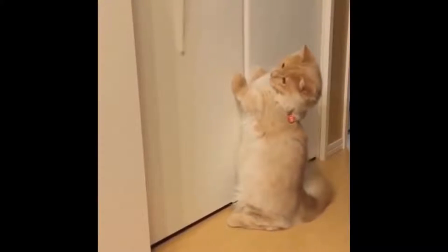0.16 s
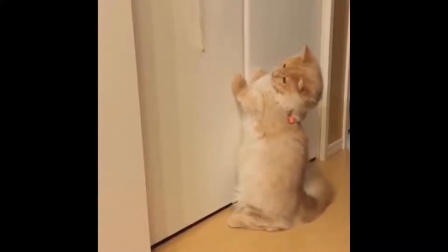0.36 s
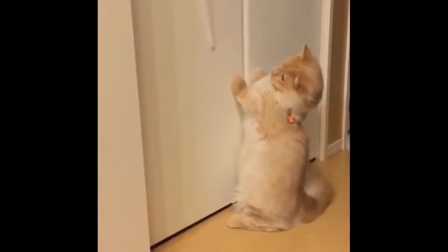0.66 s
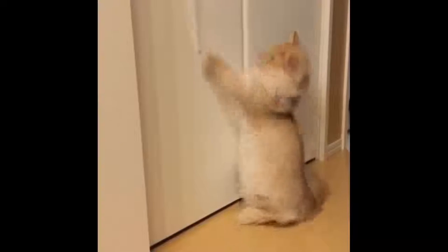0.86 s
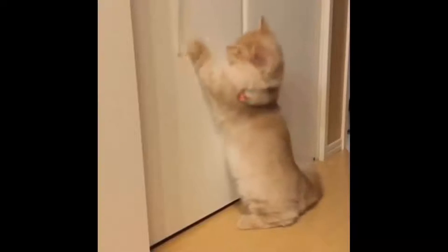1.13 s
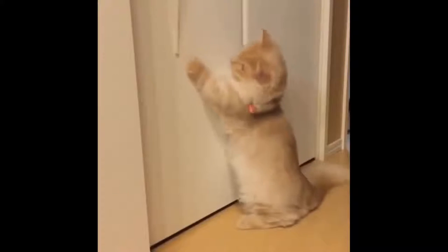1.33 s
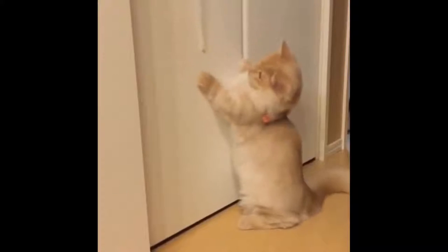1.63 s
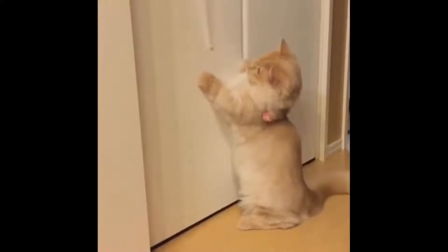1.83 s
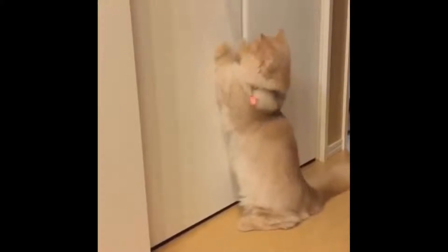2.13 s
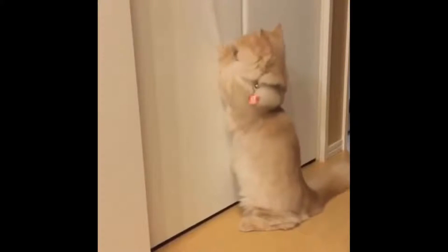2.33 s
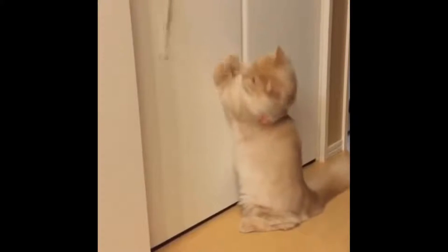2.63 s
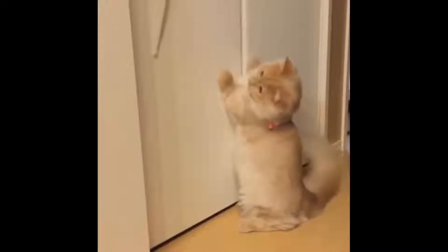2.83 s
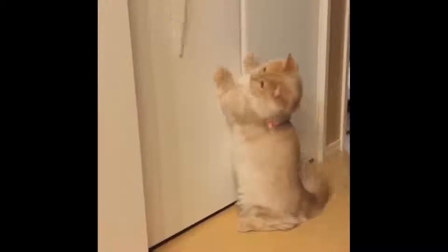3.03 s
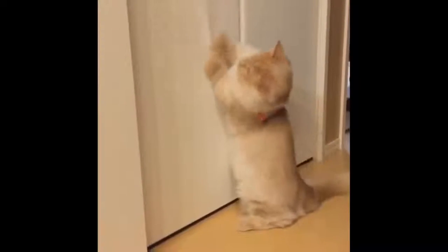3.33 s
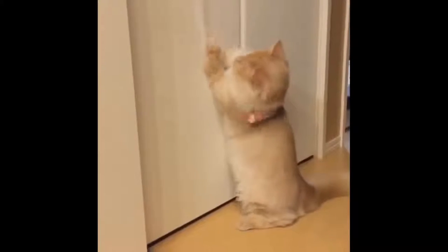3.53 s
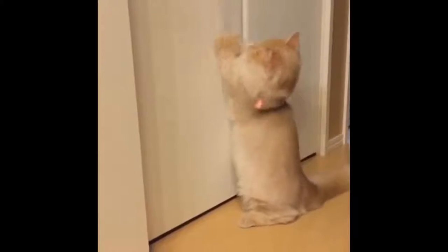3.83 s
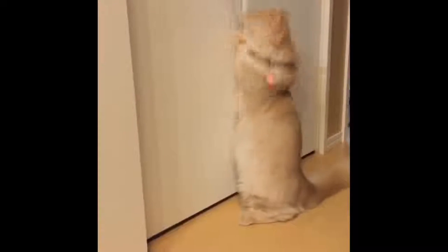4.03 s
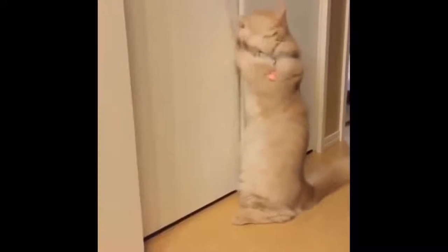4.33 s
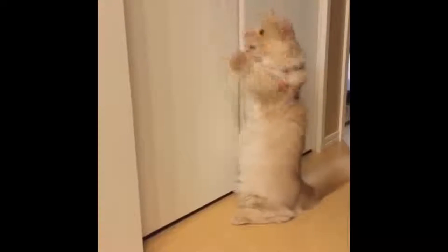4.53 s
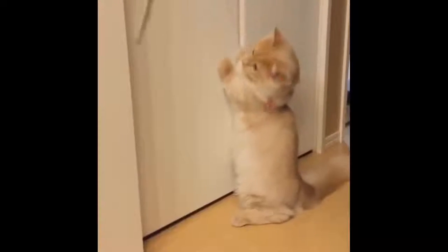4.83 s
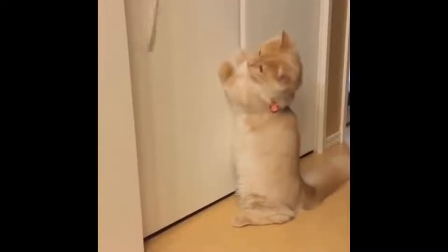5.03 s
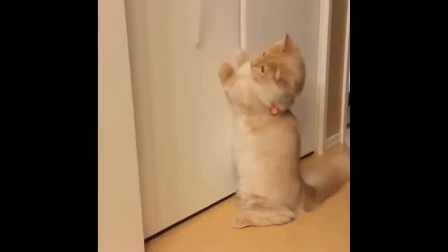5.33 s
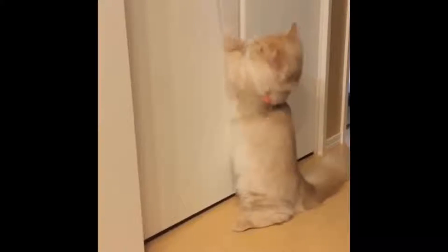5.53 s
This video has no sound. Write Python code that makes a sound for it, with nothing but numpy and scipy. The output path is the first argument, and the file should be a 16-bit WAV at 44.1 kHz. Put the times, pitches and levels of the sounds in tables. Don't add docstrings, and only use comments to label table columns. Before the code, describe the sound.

In a small quiet room with a low motor hum and faint hiss, a cat paws at a hollow door. Soft knocks, squeaky pad slips and muffled bell ticks come first; then hard slaps set off fast, bright jingling around two seconds. After a lull, a longer flurry of scratching, slapping and jingling follows, ending with two sparser taps. A small camera microphone picks it up fairly close, with a short room echo.

```python
import sys
import numpy as np
from scipy import signal
from scipy.fft import rfft, irfft
from scipy.io import wavfile
from scipy.ndimage import uniform_filter1d

SR = 44100
rng = np.random.default_rng(int(sys.argv[2]) if len(sys.argv) > 2 else 0)


def nominal_scale(level):
    x = np.asarray(level, float) / 20
    return 10 ** x


def unload_wav(signal):
    wavfile.write(
        sys.argv[1],
        SR,
        np.round(np.clip(np.atleast_2d(signal).T, -1, 1) * 32767).astype(np.int16),
    )


N = 250488

# pitch_hz, level_db
HUM = [(59.6, -57.5), (118.4, -52), (180, -67.5), (296.1, -79.5)]
# time_s, level_db
HUM_SAG = [(0, -3), (1.5, -1.5), (3, -3), (4.5, -2.5), (5.68, -3.5)]
# pitch_hz, level_db (per Hz)
AIR = [(15, -32), (35, -13), (60, -4.5), (85, -8), (118, -5), (150, -13), (185, -16), (240, -24),
       (590, -28), (1100, -36.5), (2400, -36.5), (9500, -43), (10500, -44.5), (14000, -43)]
AIR_DB, TOP_HZ = -60.5, 14000

# pitch_hz, width_hz, level_db
PANEL_LOW = [(1460, 150, -3), (1864, 50, -1), (2180, 43, -6.5), (2443, 170, -17), (1270, 520, -41)]
PANEL_HIGH = [(2540, 1160, 9), (3140, 1100, 6), (3900, 1700, 2.5)]
# pitch_hz, width_hz
FUR = (6960, 3800)
# firmest_s, pressure_db, press_s, release_s, squeak_hz
PADS = [(.4, -70, 0.12, .1, 2000), (.508, -61, 0.15, 0.017, 1460), (.56, -62.5, 0.039, 0.1, 1450),
        (1.026, -64.5, 0.12, 0.027, 1460), (1.138, -44, 0.041, 0.039, 1470),
        (1.13, -52, 0.029, 0.075, 2216), (1.224, -46.5, 0.029, 0.012, 1540),
        (1.31, -55, 0.014, 0.081, 1396), (1.42, -74, .1, 0.033, 1670), (1.26, -56.5, .03, 0.06, 1940),
        (1.722, -65, 0.11, 0.11, 1460), (1.78, -55, 0.03, 0.017, 1470), (3.264, -81, 0.085, .04, 2020),
        (3.45, -60, 0.097, 0.065, 1940), (4.39, -53, 0.021, 0.067, 1770),
        (4.442, -62.5, 0.053, 0.032, 1600)]
# firmest_s, pressure_db, press_s, release_s, squeak_hz
SCRATCHES = [(2.125, -49.5, 0.036, 0.05, 2950), (2.155, -49, 0.053, 0.058, 1760),
             (3.395, -49.5, 0.0083, 0.066, 2100), (5.315, -64, 0.023, 0.037, 2870),
             (5.015, -72, 0.015, 0.037, 2200), (2.215, -43, 0.031, 0.047, 2190),
             (2.341, -48, 0.046, 0.1, 2010), (2.603, -62.5, 0.096, 0.038, 2600),
             (3.366, -39, 0.022, 0.018, 1690), (3.525, -36, 0.028, 0.038, 1750),
             (3.692, -50, 0.022, 0.023, 1550), (3.6, -51, 0.014, 0.057, 1710),
             (4.024, -54, 0.023, 0.019, 1840)]
# firmest_s, pressure_db, press_s, release_s, centre_hz
DRAGS = [
    (3.14, -71, 0.049, .06, 2410),
    (3.215, -63.5, .08, 0.093, 2400),
    (3.265, -74, 0.034, 0.015, 2110),
    (3.835, -57, .015, 0.11, 1860),
    (3.884, -54.5, .06, 0.064, 2030),
    (3.95, -71, 0.069, .08, 1780),
    (4.0, -63, .1, .035, 1760),
]
# loudest_s, level_db, swell_s, fade_s
RUSTLES = [(1.026, -73.5, 0.079, 0.063), (1.3, -71, 0.04, 0.05), (2.13, -61.5, 0.05, 0.098),
           (2.217, -66, 0.06, 0.062), (2.398, -64.5, 0.19, 0.057), (3.366, -59.5, 0.067, 0.062),
           (3.54, -59, 0.088, 0.084), (3.69, -67, 0.047, 0.19), (4.024, -66, 0.016, 0.026),
           (4.435, -68, 0.083, 0.12), (4.504, -69, 0.022, 0.059), (4.76, -76, 0.35, 0.28)]
SLIPS_PER_S, SLIP_SPREAD_DB, CLUMP_DB = 2800, 2, 2.8

# start_s, level_db, pitch_hz, fall_60db_s
CATCHES = [(.501, -51, 1460, 0.075), (1.094, -48, 1460, 0.049), (1.122, -47, 2160, .06),
           (1.137, -43, 2155, 0.062), (1.138, -42.5, 1425, 0.056), (1.216, -49, 2240, .05),
           (1.222, -49, 1572, 0.044), (1.244, -54, 1500, .05), (1.773, -51.5, 1410, 0.056),
           (2.1, -45, 1390, 0.053), (2.106, -44, 2270, .04), (2.107, -48, 3160, .04),
           (2.109, -56, 1380, 0.072), (2.11, -43, 4160, 0.055), (2.116, -40.5, 2180, 0.068),
           (2.116, -43, 3300, .04), (2.119, -52, 2760, .04), (2.12, -52, 1410, .07),
           (2.172, -50, 1460, 0.06), (2.127, -42, 2734, 0.057), (2.127, -43, 4440, 0.036),
           (2.128, -45, 2350, 0.052), (2.132, -46.5, 1354, 0.12), (2.146, -40.5, 2000, .06),
           (2.153, -47, 1590, 0.065), (2.161, -48, 1985, 0.069), (2.202, -43, 2200, 0.073),
           (2.212, -43, 2930, .05), (2.218, -40, 2210, 0.041), (3.328, -54.5, 1460, 0.087),
           (3.344, -53, 1390, .05), (3.357, -39.5, 1410, 0.06), (3.365, -36.5, 2236, 0.039),
           (3.365, -36, 1490, 0.061), (3.391, -48, 1460, 0.07), (3.398, -43, 2350, .05),
           (3.398, -43, 3900, 0.045), (3.402, -46, 1960, 0.043), (3.576, -45, 1545, .09),
           (3.681, -52, 1534, .05), (3.692, -45, 1518, 0.066), (3.697, -49.5, 2370, 0.07),
           (3.858, -54, 2160, .06), (3.876, -57, 1800, .05), (3.886, -54, 3230, 0.067),
           (3.892, -64, 2000, 0.066), (4.026, -44.5, 1803, 0.038), (4.024, -46, 3230, 0.033),
           (4.379, -39, 1560, 0.038), (4.397, -60, 1630, 0.069), (4.404, -57, 1716, 0.063),
           (3.823, -61, 1415, 0.19), (4.009, -56, 874, 0.088)]
# start_s,
# level_db, pitch_hz, fall_60db_s
CHATTER = [(2.3125, -36, 7700, .012), (2.3125, -36, 10400, 0.011), (2.317, -37, 8600, .012),
           (3.5, -37, 8200, .012), (2.311, -37, 2000, 0.052), (2.311, -43, 2900, 0.023),
           (2.314, -23.5, 1530, 0.031), (2.315, -36, 2500, 0.036), (2.319, -43, 3050, 0.039),
           (2.334, -37, 1940, 0.052), (2.335, -41, 2600, .04), (2.349, -40, 1840, 0.043),
           (2.368, -40, 1460, 0.036), (2.5915, -38.5, 2350, 0.012), (2.5915, -50, 1150, 0.01),
           (2.598, -60, 2740, 0.069), (2.75, -54, 2020, .05), (2.752, -58, 2662, 0.079),
           (3.4995, -30.5, 3160, 0.024), (3.4995, -36, 4040, .03), (3.5, -30, 2260, 0.015),
           (3.504, -43, 2320, .03), (3.508, -30.5, 1767, 0.042), (3.518, -37, 1420, 0.055),
           (3.521, -36, 2174, 0.088), (3.521, -43, 3980, 0.087), (3.53, -49, 3190, 0.061),
           (3.537, -38, 1460, .05), (3.551, -44, 1460, 0.041), (3.556, -44, 2070, 0.056),
           (4.319, -40.5, 3180, 0.037), (4.319, -39, 960, 0.025), (4.319, -27.5, 2080, 0.023),
           (4.321, -44, 4220, 0.027), (4.327, -40, 2080, .04), (4.329, -50, 1270, 0.06),
           (4.342, -43, 1940, 0.066), (4.336, -51.5, 299, .12), (4.43, -54, 300, .1),
           (4.9925, -49, 1890, 0.027), (4.9925, -35.5, 2160, 0.022), (4.9925, -54, 720, 0.088),
           (5.001, -40, 2040, 0.041), (5.004, -49, 1330, 0.046), (5.009, -51, 1840, .04),
           (5.014, -41, 2050, 0.056), (5.306, -50, 1890, .04), (5.307, -52.5, 2730, .05),
           (5.319, -64, 2800, 0.045), (5.324, -60, 2300, .06)]
CATCH_RISE_S, CHATTER_RISE_S = 0.0013, 0.00075

# start_s, level_db, pitch_hz, second_pitch_hz, crack_db (against the blow)
KNOCKS = [(0.5019, -82, 1450, 1980, -24), (1.0191, -66.5, 1500, 2060, -13),
          (1.0943, -54.5, 1590, 2130, -15), (1.113, -51.5, 2720, 2220, -7.5),
          (1.1355, -50, 2180, 1530, -12), (1.2223, -42.5, 1600, 2240, -21), (1.776, -69, 1440, 1920, -23),
          (2.1073, -43, 1490, 2180, -12), (2.204, -41.5, 2270, 1370, -5.5), (3.253, -57, 1780, 2180, -13),
          (3.359, -47, 1520, 2370, -18), (3.3909, -42.5, 1960, 2600, -4.5),
          (3.678, -48.5, 1580, 2290, -2.5), (3.8646, -58, 2130, 2210, -7.5),
          (4.379, -42.5, 1650, 1470, -10)]
# start_s, level_db, pitch_hz, second_pitch_hz, crack_db (against the blow)
TIPS = [
    (2.5917, -48.5, 2600, 1080, -15),
    (2.7508, -46, 2070, 2690, -12),
    (5.3053, -44, 1940, 2720, -12.5),
]
# start_s, level_db, pitch_hz, second_pitch_hz, crack_db (against the blow)
SLAPS = [
    (1.214, -42, 1600, 1010, -14),
    (1.3066, -46, 1150, 680, -18),
    (2.311, -27, 1620, 1180, -5),
    (3.5, -28, 2020, 1520, 1),
    (4.0247, -50.5, 1840, 2480, 5),
    (4.319, -33.5, 2120, 1310, -10.5),
    (4.9922, -34.5, 1850, 1480, -13),
]
KNOCK_T60, TIP_T60, SLAP_T60 = 0.24, 0.16, 0.27
THIN_HZ = 1150

# pitch_hz, level_db, fall_60db_s
SHELL_LOW = [(5598, 0, 0.115), (5572, -9.5, 0.22)]
SHELL_HIGH = [(13855, 0, .14), (13812, -5, .12), (13456, -21, .12)]
# pitch_hz, width_hz, level_db
TICK = [(6350, 400, 2.5), (6800, 7000, 4.5), (7470, 1600, -1), (8280, 770, 3.5), (9030, 590, -6.5),
        (11600, 2700, -7)]
# start_s, ring_db, pitch_hz, tick_db (against the ring)
MUFFLED = [(1.0216, -58, 6360, -11), (1.2978, -50, 6280, -18), (1.3274, -56.5, 6330, -1),
           (2.715, -84.5, 6300, 33), (3.289, -59.5, 6350, -2), (3.346, -40, 6270, -19),
           (3.412, -42.5, 6320, 0), (3.6178, -43, 6000, -5), (3.695, -51, 6160, -15),
           (3.864, -56, 6330, -14), (3.952, -61, 6170, 4), (4.305, -49, 6300, 5), (4.8938, -55, 6520, 7.5),
           (4.948, -67, 6260, 16.5), (5.0325, -64, 6340, 3), (5.165, -56, 6200, 1), (5.174, -55, 6460, 1),
           (5.598, -57.5, 6300, 4), (5.619, -65.5, 6240, 14), (5.643, -56, 6440, 5.5)]
# start_s, low_ring_db, high_ring_db, tick_db (last two against low)
FREE_STRIKES = [(2.108, -51, -24, -15), (2.1263, -37, -28, -11), (2.14, -39.5, -4, -28), (2.161, -47.5, -12, 2),
                (2.187, -42, -20, -8), (2.195, -38.5, -12, -17), (2.212, -44, -19, -32),
                (2.2525, -56, -14, -18), (2.344, -46, -9, -4), (2.369, -37, -22, -19), (2.387, -44.5, -1, -1),
                (2.396, -44, -4, -12), (2.428, -48, -9, -20), (2.503, -54, -45, -12), (2.5177, -43.5, -18, -11),
                (2.528, -41.5, -22, -18), (2.563, -56, -32, -25), (3.563, -45, -7, -25), (3.737, -48.5, 2, -25),
                (3.813, -54, -17, -25), (3.94, -61, -22, -20), (3.5512, -40, -9, -21), (3.574, -44, -3, -22),
                (3.59, -36.5, -10, -11), (3.606, -32, -8, -12), (3.637, -40, -3, -9), (3.659, -43.5, 4, -9),
                (3.669, -42, 2, -20), (3.693, -50.5, 5, -14), (3.718, -38.5, -9, -21), (3.751, -50.5, -2, -18),
                (3.789, -46, -3.5, -29), (3.9062, -42.5, -13, -8),
                (4.043, -40, -5, -15), (4.0664, -42.5, -8, -28), (4.089, -38, -1, -12),
              (4.144, -38, -9.5, -14), (4.104, -47, -1, -27), (4.193, -52.5, 0, -25),
              (4.525, -42.5, -1, -28), (4.642, -70, -22, -20), (4.242, -52, -12, -18), (4.297, -45, -6, -6),
              (4.3197, -38.5, -23, -5), (4.335, -38, -19, -16), (4.346, -35.5, -15, -13),
              (4.37, -55, 7, -7), (4.3882, -48, 0, -9), (4.4135, -35, -27, -9), (4.423, -36, -13, -11),
              (4.4413, -36, -8, -11), (4.454, -44.5, 4, -24), (4.471, -46, -6, -16),
              (4.4829, -38, -11, -16), (4.505, -29.5, -18, -15), (4.569, -42, -9, -18),
              (4.679, -71, -16, -9), (4.695, -42.5, -16, -7), (5.0502, -41.5, -20, -3),
              (5.0977, -44.5, -37, -8), (5.1935, -43.5, -10, -11), (5.246, -61, -26, -14)]
RESTS_S = [2.153, 2.178, 2.29, 2.4793, 2.541, 3.651, 3.677, 3.706, 3.73, 3.808, 3.922, 4.082, 4.1, 4.262,
           4.31, 4.357, 4.458, 4.476, 4.618, 5.086, 5.1497, 5.203]
MUFFLED_T60, RING_RISE_S = 0.055, 0.0028
SHELL_WANDER = .0016
STEP_SLIP = 1.0
ROLL_DB = 2.3

# start_s, level_db, pitch_hz, fall_60db_s, upper_db (against the thud)
THUDS = [(1.236, -43.5, 276, 0.09, -10.5), (1.228, -41.5, 180, 0.085, -23), (1.257, -38.5, 133, 0.14, -29),
         (1.307, -37, 262, 0.13, -12), (1.343, -45, 280, 0.09, -10), (1.389, -51, 272, 0.076, -14),
         (1.44, -53, 330, .08, -20), (4.14, -58, 320, .1, -20), (3.37, -55, 240, .1, -15),
         (2.2, -52, 260, .1, -15), (1.435, -41, 130, 0.088, -36), (2.099, -30.5, 238.5, 0.078, -11.5),
         (2.138, -45, 348, 0.069, -7), (2.303, -31.5, 285.7, 0.091, -15), (2.339, -46, 364, 0.093, 4),
         (3.497, -34.5, 231.6, 0.11, -4), (3.538, -41.5, 356, 0.056, -9), (4.319, -32.5, 249, 0.067, -14.5),
         (2.75, -53.5, 925, 0.073, -28), (4.825, -47, 180, 0.12, -17)]
# start_s, level_db
BUMPS = [
    (1.3167, -35),
    (1.3655, -40),
    (2.331, -49),
    (3.52, -43),
    (4.352, -44),
]
BUMP_HZ, BUMP_T60 = 61.5, .36

# pitch_hz, fall_60db_s
ROOM = [(200, 0.38), (1500, 0.13), (5000, 0.17), (13000, 0.15)]
ROOM_DB = -2.5
CATCH_ROOM, THUD_ROOM, BELL_ROOM = 0.3, .4, .35


def evened(x):
    return x / np.sqrt(np.mean(x ** 2) + 1e-20)


def wander(n, span):
    return evened(uniform_filter1d(rng.standard_normal(n), span))


def read(points, hz):
    f, value = np.transpose(points)
    return np.interp(np.log(hz + 1), np.log(f + 1), value)


def add(mix, s, sound):
    part = mix[round(s * SR):][:len(sound)]
    part += sound[:len(part)]


def rise(t, rise_s):
    return 1 - np.exp(-t / rise_s)


def fall(t, t60):
    return nominal_scale(-60 * t / t60)


def ring(modes, t, detune=1, phase=0):
    x = np.zeros(len(t))
    for hz, db, t60 in modes:
        x += nominal_scale(db - 60 * t / t60) * np.sin(2 * np.pi * hz * detune * t + phase)
    return x / abs(x).max()


def resonate(x, hz, width):
    turn = np.exp(2j * np.pi * np.cumsum(hz * np.ones(len(x))) / SR)
    r = np.exp(-np.pi * width / SR)
    smooth = signal.lfilter([(1 - r) ** 2], [1, -2 * r, r * r], x / turn)
    return 2 * (turn * smooth).real


def thin(x):
    return signal.sosfilt(signal.butter(4, THIN_HZ, "high", fs=SR, output="sos"), x)


def hum():
    t, out = np.arange(N) / SR, np.zeros(N)
    sag = np.interp(t, *np.transpose(HUM_SAG))
    for hz, db in HUM:
        level = nominal_scale(db + sag + 0.81 * wander(N, 6000))
        out += np.sqrt(2) * level * np.sin(2 * np.pi * hz * t)
    return out


def air():
    hz = np.fft.rfftfreq(N, 1 / SR)
    spectrum = rfft(rng.standard_normal(N)) * nominal_scale(read(AIR, hz)) * (hz < TOP_HZ)
    return nominal_scale(AIR_DB) * evened(irfft(spectrum, N))


def swell(s, db, rise_s, fall_s):
    at = np.arange(max(round((s - 2 * rise_s) * SR), 0), round((s + 2 * fall_s) * SR))
    late = at / SR - s
    return at, nominal_scale(db - 20 * np.maximum(-late / rise_s, late / fall_s))


def slipping():
    happens = rng.random(N) < SLIPS_PER_S / SR
    size = nominal_scale(SLIP_SPREAD_DB * np.minimum(rng.exponential(1, N), 4))
    return happens * size * rng.standard_normal(N) * nominal_scale(CLUMP_DB * wander(N, 350))


def panel(slips, modes):
    return evened(sum(nominal_scale(db) * evened(resonate(slips, hz, width)) for hz, width, db in modes))


def strokes():
    slips, out = slipping(), np.zeros(N)
    low, high = panel(slips, PANEL_LOW), panel(slips, PANEL_HIGH)
    fur = evened(resonate(rng.standard_normal(N), *FUR)) * nominal_scale(wander(N, 250))
    # rows, claw level dB, squeak width Hz (claws smear it), share of low panel
    for rows, claw_db, width, share in ((PADS, -18.5, 170, .15), (SCRATCHES, -6, 340, .35),
                                        (DRAGS, -17, 1240, .15)):
        for *stroke, hz in rows:
            at, pressure = swell(*stroke)
            squeak = evened(resonate(slips[at], hz, width))
            out[at] += pressure * (0.47 * squeak + share * low[at] + nominal_scale(claw_db) * high[at])
    for row in RUSTLES:
        at, brush = swell(*row)
        out[at] += brush * fur[at]
    return out


def catches():
    out, t = np.zeros(N), np.arange(SR // 8) / SR
    for rows, rise_s in ((CATCHES, CATCH_RISE_S), (CHATTER, CHATTER_RISE_S)):
        for s, db, hz, t60 in rows:
            pair = [(hz, 0, t60), (1.09 * hz, -16, t60)]
            add(out, s, nominal_scale(db) * ring(pair, t) * rise(t, rise_s))
    return out


def blow(hz, second_hz, claw_db, t60, broad, hold, width):
    t = np.arange(SR // 3) / SR
    noise = rng.standard_normal(len(t))
    contact = rise(t, .0003) * (1 + np.exp(-t / .001)) / (1 + (t / hold) ** 4)
    rattle = noise * (contact + 0.51 * fall(t, t60))
    body = resonate(rattle, hz, width) + 0.37 * resonate(rattle, second_hz, width)
    body += broad * resonate(rattle, 1860, 2520)
    claw = resonate(noise, 5400, 7350) * (.5 * contact ** 2 + 0.34 * fall(t, 0.19))
    return body / abs(body).max() + nominal_scale(claw_db - 2.5) * claw


def knocks():
    out = np.zeros(N)
    for s, db, *colour in KNOCKS:
        add(out, s, nominal_scale(db + 1.5) * thin(blow(*colour, KNOCK_T60, broad=0.31, hold=0.012, width=420)))
    for s, db, *colour in TIPS:
        add(out, s, nominal_scale(db - 3.0) * thin(blow(*colour, TIP_T60, broad=0.38, hold=0.0095, width=630)))
    for s, db, *colour in SLAPS:
        add(out, s, nominal_scale(db - 1.5) * blow(*colour, SLAP_T60, broad=0.95, hold=0.0078, width=360))
    return out


def tick(t, chance, rise_s, linger):
    clumps = nominal_scale(3.7 * wander(len(t), 120))
    fade = fall(t, .04) + linger * fall(t, .15)
    chatter = clumps * rng.standard_normal(len(t)) * fade * rise(t, rise_s)
    x = np.zeros(len(t))
    for hz, width, db in TICK:
        x += nominal_scale(db) * resonate(chatter, hz * (1 + 0.035 * chance), width) / np.sqrt(width)
    return x / abs(x).max()


def bell():
    out, t, strikes = np.zeros(N), np.arange(SR // 3) / SR, FREE_STRIKES
    drift = uniform_filter1d(uniform_filter1d(rng.standard_normal(N), 220), 150)
    rolling = nominal_scale(ROLL_DB * evened(drift))
    touches = np.sort([row[0] for row in strikes] + RESTS_S + [N / SR])
    for s, db, high_db, tick_db in strikes:
        hold_chance, tick_chance = rng.uniform(-2.0, 0.68, 2)
        slip = STEP_SLIP * rng.standard_normal()
        end = touches[touches > s][0]
        choke = np.clip((end - s - t) / 0.0055 + 1, 0, 1) * np.resize(rolling[round(s * SR):], len(t))
        low_phase = 2 * np.pi * SHELL_LOW[0][0] * s + slip
        high_phase = 2 * np.pi * SHELL_HIGH[0][0] * s + 2 * slip
        low = ring(SHELL_LOW, t, 1 + SHELL_WANDER * hold_chance, low_phase) * rise(t, RING_RISE_S)
        high = ring(SHELL_HIGH, t, 1, high_phase) * rise(t, 0.003)
        contact = nominal_scale(tick_db) * tick(t, tick_chance, rise_s=0.0029, linger=0.43)
        add(out, s, nominal_scale(db) * (choke * (low + nominal_scale(high_db) * high) + contact))
    for s, db, hz, tick_db in MUFFLED:
        held = ring([(hz, 0, MUFFLED_T60), (hz + 90, -8, MUFFLED_T60)], t) * rise(t, 0.00038)
        held = held * np.resize(rolling[round(s * SR):], len(t))
        contact = nominal_scale(tick_db) * tick(t, rng.uniform(-2.3, 1), rise_s=0.0012, linger=0.1)
        add(out, s, nominal_scale(db) * (held + contact))
    return out


def thuds():
    out, t = np.zeros(N), np.arange(SR // 3) / SR
    for s, db, hz, t60, upper_db in THUDS:
        body = ring([(hz, 0, t60), (1.22 * hz, -7, t60), (0.64 * hz, -8, t60)], t)
        upper = evened(resonate(rng.standard_normal(len(t)), 190, 1360))
        upper = upper * fall(t, 0.16) * (1 - np.exp(-(t / 0.0017) ** 2))
        add(out, s, nominal_scale(db + 7.0) * (body + nominal_scale(upper_db - 8.0) * upper) * rise(t, 0.0063))
    for s, db in BUMPS:
        add(out, s, nominal_scale(db) * ring([(BUMP_HZ, 0, BUMP_T60)], t) * rise(t, .01))
    return out


def room(x):
    taps = np.zeros(SR // 2)
    at = np.arange(120, len(taps) - 20, 20)
    taps[at + rng.integers(0, 20, len(at))] = rng.choice([-1., 1.], len(at))
    hz, t, z = signal.stft(taps, SR, nperseg=256)
    tail = signal.istft(z * fall(t, read(ROOM, hz)[:, None]), SR, nperseg=256)[1]
    return signal.fftconvolve(x, tail / np.linalg.norm(tail))[:N]


def scene():
    floor = hum() + air()
    paws, touches = thin(strokes()) + knocks(), catches()
    jingle, door = bell(), thuds()
    walls = room(paws + THUD_ROOM * door + BELL_ROOM * jingle + CATCH_ROOM * touches)
    return (nominal_scale(-1.52) * jingle + paws + door + touches + nominal_scale(ROOM_DB) * walls + floor)[None]


def roll_off(x):
    return signal.sosfilt(signal.butter(12, 15360, fs=SR, output="sos"), x)


def record(dry):
    edge = signal.firwin(81, TOP_HZ + 350, window=("kaiser", 7), fs=SR)
    mix = signal.oaconvolve(dry, edge[None], "same")
    return roll_off(mix)


dry = scene()
out = record(dry)
unload_wav(out)
```